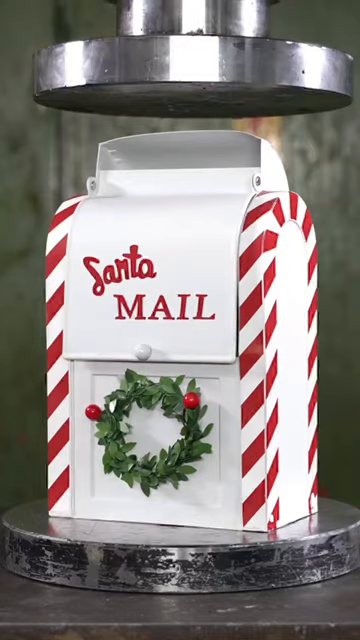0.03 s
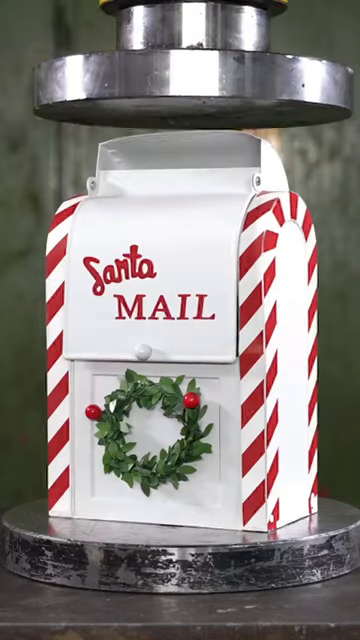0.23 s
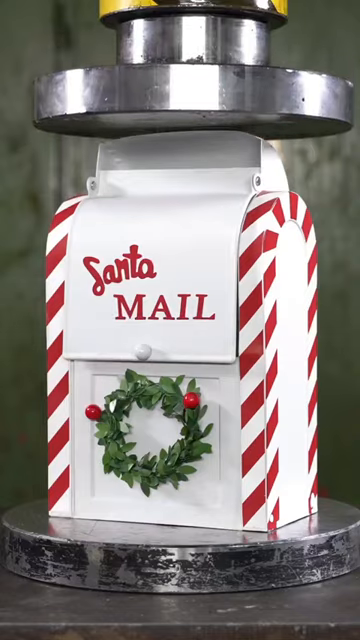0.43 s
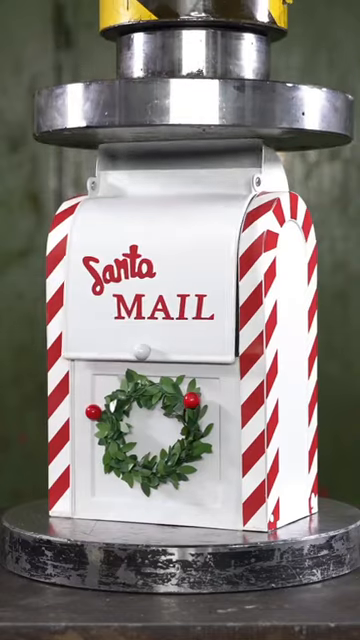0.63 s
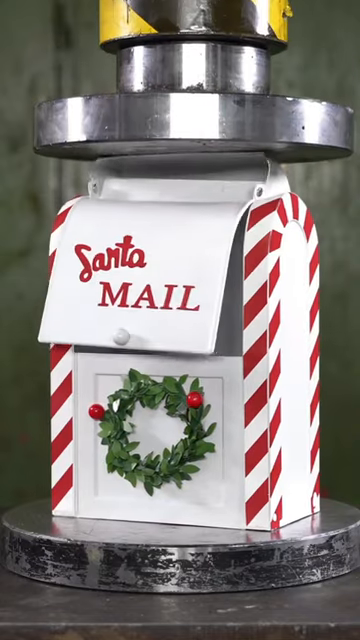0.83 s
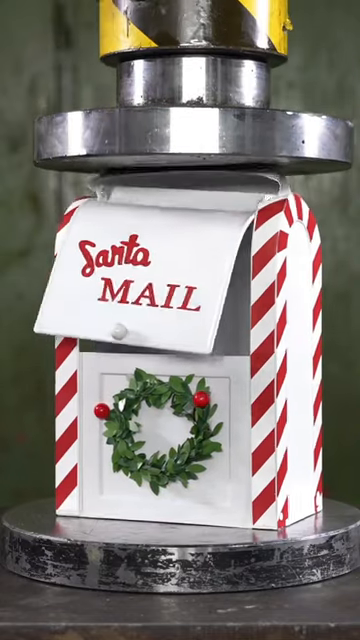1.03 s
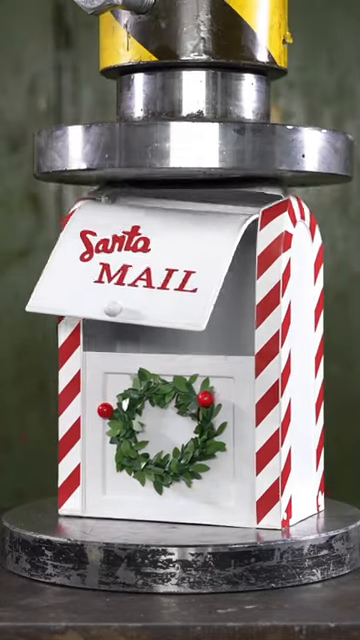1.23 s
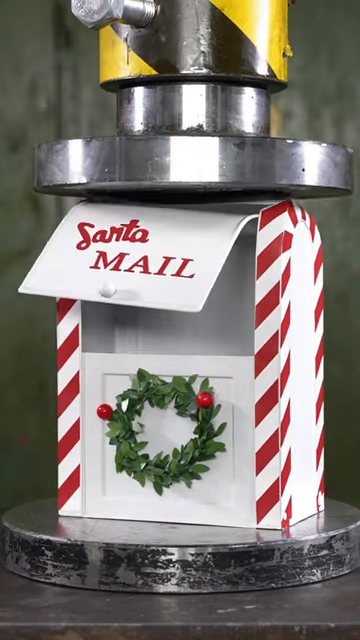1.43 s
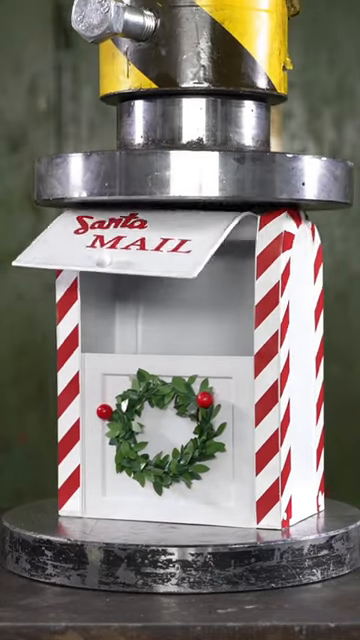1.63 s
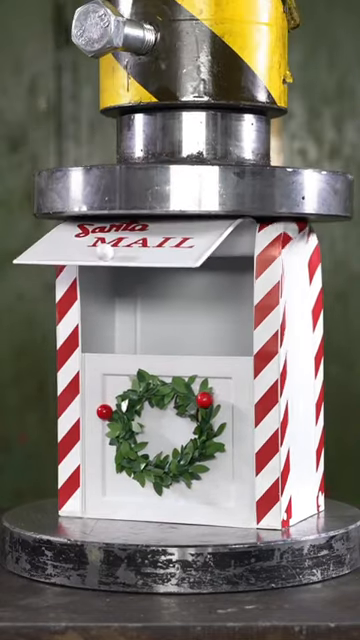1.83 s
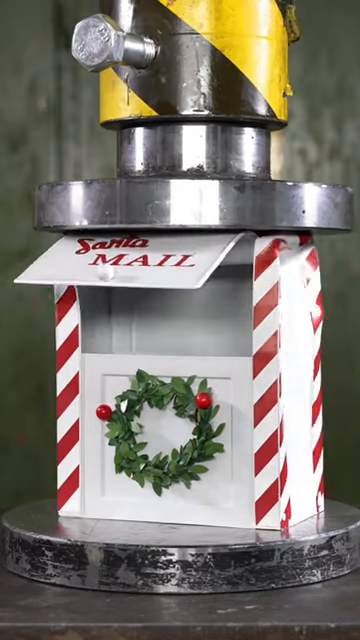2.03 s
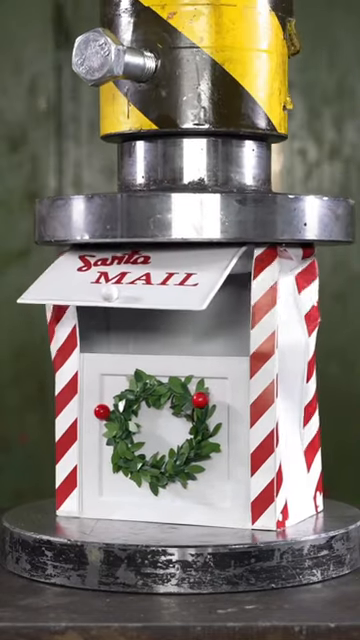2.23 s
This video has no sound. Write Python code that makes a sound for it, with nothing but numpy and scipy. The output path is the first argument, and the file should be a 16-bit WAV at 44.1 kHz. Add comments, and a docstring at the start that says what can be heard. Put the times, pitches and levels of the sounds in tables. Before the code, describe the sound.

Four sharp crunches come from a decorative mailbox being crushed in a workshop, close to the microphone. The hydraulic press hums first, then grows quieter as the walls give way, crackling and creaking over a soft rush of oil.

```python
"""A cardboard box buckles in four crunches under a humming hydraulic press in a workshop.
Each crunch is a dense swell of tiny fractures that sets the box's panels ringing.
Between the crunches the strained board crackles and gives small creaks.
The pump's hum gets quieter and its whine changes tone as the box gives way.
Behind it are rushing oil, faint motor tones and a thin whistle."""
import sys
import numpy as np
from scipy import signal
from scipy.fft import rfft, irfft
from scipy.io import wavfile
from scipy.ndimage import uniform_filter1d, map_coordinates

SR = 44100
rng = np.random.default_rng(int(sys.argv[2]) if len(sys.argv) > 2 else 0)


def dump_mix(stems):
    """Bounce the given channels to the path in sys.argv[1] as a 16-bit WAV at rate SR."""
    frames = np.atleast_2d(stems).T  # one column per channel
    limited = np.clip(frames, -1, 1)  # hard clip at full scale
    pcm = np.round(limited * 32767).astype(np.int16)
    wavfile.write(sys.argv[1], SR, pcm)


N = 105840
T = np.arange(N) / SR
HZ = np.fft.rfftfreq(N, 1 / SR)
BURST_T = np.arange(-2048, 6144) / SR  # seconds around the peak of a short sound


def amp(db):
    """Turns decibels into a gain."""
    return 10 ** (np.asarray(db) / 20)

def unit(x):
    """Scales a signal to an average (rms) level of 1."""
    return x / np.sqrt(np.mean(x ** 2) + 1e-20)

def curve(points):
    """Joins (time_s, value) points with straight lines."""
    return np.interp(T, *np.transpose(points))

def shape(points, hz):
    """Joins (pitch_hz, level_db) points, giving every octave equal room."""
    point_hz, db = np.transpose(points)
    return np.interp(np.log(hz + 1), np.log(point_hz), db)

def wander(axis, step):
    """A smooth random drift that changes about once per step."""
    knots = rng.standard_normal(2048)
    return unit(map_coordinates(knots, [axis / step], order=3, mode="wrap"))

def band(x, low_hz, high_hz, order=20):
    """Keeps the sound between two frequencies."""
    hz = np.fft.rfftfreq(len(x), 1 / SR) + 1
    cut = np.sqrt((1 + (low_hz / hz) ** order) * (1 + (hz / high_hz) ** order))
    return irfft(rfft(x) / cut, len(x))

def tone(cycles, level_db, waver_db=1.76, waver_hz=6.014):
    """A pure tone whose level wavers at random."""
    gain = amp(level_db + waver_db * wander(T, .5 / waver_hz))
    return np.sqrt(2) * gain * np.sin(2 * np.pi * (cycles + rng.random()))

def swell(rise_s, fall_s):
    """A loudness outline: smooth rise, rounded top, fading tail."""
    rising = -.5 * (BURST_T / rise_s) ** 2
    falling = 1 - np.hypot(1, BURST_T / fall_s * np.sqrt(2))
    return np.exp(np.where(BURST_T < 0, rising, falling))

def add(mix, peak_s, sound):
    """Places a short sound so that it peaks at the given time."""
    part = mix[round((peak_s + BURST_T[0]) * SR):][:len(sound)]
    part += sound[:len(part)]

def room(x, split_hz=2000, bass_fade_s=.44, treble_fade_s=.19):
    """The workshop's short echo, duller as it dies away."""
    noise = rng.standard_normal(N)
    bass = band(noise, 20, split_hz)
    tail = bass * amp(-60 * T / bass_fade_s) + (noise - bass) * amp(-60 * T / treble_fade_s)
    return signal.fftconvolve(x, tail / np.linalg.norm(tail))[:N]

# Tone colour of the oil and the workshop: pitch_hz, relative_db
RUSH_COLOUR = [(25, -23), (80, -16), (170, -10), (270, 2.5), (400, -3.5), (540, 1), (800, -9), (1500, -7.5),
               (2200, -11.5), (3800, -18.5), (4500, -14.5), (5700, -14.5), (6600, -22.5), (7600, -18.5),
               (8500, -26.5), (10000, -31.5), (14000, -48)]

def oil_rush(level_db=-52.5, patch_db=1.6, ripple_db=3, ripple_hz=70):
    """Oil rushing through pipes: noise with narrow resonances and drifting louder patches."""
    ripple = ripple_db * wander(HZ, ripple_hz) * np.minimum(HZ / 2500, 1)
    noise = irfft(rfft(rng.standard_normal(N)) * amp(shape(RUSH_COLOUR, HZ) + ripple), N)
    grid = signal.stft(noise, nperseg=512)[2]  # the noise laid out by pitch and time
    patches = uniform_filter1d(rng.standard_normal(grid.shape), size=6, axis=0)
    patches = unit(uniform_filter1d(patches, size=8, axis=1))
    rush = signal.istft(grid * amp(patch_db * patches), nperseg=512)[1][:N]
    return amp(level_db) * unit(rush)

# Faint motor tones: pitch_hz, level_db
MOTOR_TONES = [(50, -81), (99, -77.5), (148, -76), (247, -65.5), (272, -63), (321, -58.5), (500, -63),
               (568, -65)]
# A machine tone that comes and goes: time_s, level_db
DRONE_LEVEL = [(.35, -61), (.48, -75), (.73, -58), (.85, -75), (1.13, -54), (1.25, -75), (1.8, -63.5),
               (2.2, -58.5)]

def motor(drone_hz=741):
    """The motor's faint tones, with one more that fades in and out."""
    steady = sum(tone(hz * T, db) for hz, db in MOTOR_TONES)
    return steady + tone(drone_hz * T, curve(DRONE_LEVEL))

# Pump speed, one stroke per cycle: time_s, pitch_hz
PUMP_SPEED = [(.15, 296.4), (.8, 295.9), (1.15, 297), (2.4, 297.3)]

def pump_strokes():
    """Counts the strokes the pump has made so far."""
    return np.cumsum(curve(PUMP_SPEED)) / SR

def whistle(strokes, pitch_hz=9140, level_db=-78.5):
    """A thin whistle, chopped by the pump's strokes."""
    pulses = unit(np.maximum(np.cos(2 * np.pi * strokes), 0) ** 2)
    return pulses * tone(pitch_hz * T, level_db)

def shaft(strokes, strokes_per_turn=12, level_db=-55.5, spread_db=3.5):
    """Weak tones at multiples of the shaft's turning rate, coloured by the same pipes as the oil."""
    turns = strokes / strokes_per_turn
    turn_hz = curve(PUMP_SPEED).mean() / strokes_per_turn
    out = np.zeros(N)
    for k in range(strokes_per_turn + 2, 100):
        if k % strokes_per_turn:  # skip the pump's own tones
            gain = amp(shape(RUSH_COLOUR, k * turn_hz) + spread_db * rng.standard_normal())
            out += gain * np.sin(2 * np.pi * (k * turns + rng.random()))
    return amp(level_db) * unit(out)

# The pump's lowest tone: time_s, level_db
HUM_LEVEL = [(.15, -33.5), (.5, -35), (.87, -36), (1.01, -34.5), (1.05, -55), (1.13, -46), (1.7, -44.5),
             (2.0, -48), (2.17, -46.5), (2.4, -50)]
# The tone an octave above it: time_s, level_db
OCTAVE_LEVEL = [(.15, -44), (.27, -46), (.33, -39.5), (.48, -39.5), (.6, -44.5), (.65, -53), (.73, -43),
                (1.0, -44), (1.1, -53.5), (1.35, -53), (1.48, -45), (1.53, -57), (1.7, -48), (1.8, -64),
                (2.4, -52.5)]
# Tones at 3, 4, 5... times the pump's pitch: start_db, after_first_give_db, after_second_give_db
WHINE_LEVELS = [(-58, -57, -55.5), (-49.5, -59.5, -56.5), (-54, -54.5, -54.5), (-61, -60.5, -57),
                (-59.5, -57.5, -66), (-66.5, -70, -69), (-68, -69, -66), (-71.5, -70.5, -66.5),
                (-67.5, -76, -77)]
# Slow swell of the tone at 5 times the pump's pitch: time_s, boost_db
FIFTH_TONE_SWELL = [(.24, -3.5), (.3, 3.5), (.37, -1), (.43, 5), (.5, -0.5), (.85, -6.5), (.96, 1.5),
                    (1.14, 0), (1.24, -10), (1.34, -7), (1.41, 3.5), (1.78, 1.5), (2.1, -12), (2.2, 2),
                    (2.4, -3)]

def pump(strokes, give_s=(1.04, 1.31), give_length_s=.055, top_db=-76.5, top_db_per_octave=-4.5):
    """The pump's strokes hum and whine; its load changes both times the box gives way."""
    hum = tone(strokes, curve(HUM_LEVEL), waver_db=.34)
    hum += tone(2 * strokes, curve(OCTAVE_LEVEL), waver_db=.68)
    first_give, second_give = (np.clip((T - s) / give_length_s + .5, 0, 1) for s in give_s)
    whine_db = {k: start + (middle - start) * first_give + (end - middle) * second_give
                for k, (start, middle, end) in enumerate(WHINE_LEVELS, 3)}
    whine_db[5] += curve(FIFTH_TONE_SWELL)
    last = max(whine_db)
    for k in range(last, 26):  # ever fainter tones above those in the table
        whine_db[k + 1] = top_db + top_db_per_octave * np.log2(k / last)
    return hum + sum(tone(k * strokes, db) for k, db in whine_db.items())

# Tone colour that the box gives every fracture: pitch_hz, relative_db
BOARD_COLOUR = [(150, -5), (230, -2.5), (330, 1), (560, -2), (800, -2.5), (1050, 1.5), (1800, 1.5),
                (5500, 1), (12500, -3.5)]

def fractures(per_s, size, spread_db=2.4, ripple_db=3, ripple_hz=90):
    """Tiny snaps of uneven size, coloured by the board's many close resonances."""
    hz = np.fft.rfftfreq(size, 1 / SR)
    snaps = (rng.random(size) < per_s / SR) * rng.choice([-1, 1], size)
    strengths = amp(spread_db * np.minimum(rng.exponential(1, size), 4))
    ripple = ripple_db * wander(hz, ripple_hz) * np.minimum(hz / 1500, 1)
    return irfft(rfft(snaps * strengths) * amp(shape(BOARD_COLOUR, hz) + ripple), size)

# The fine, high crackle of strained board: time_s, level_db
CRACKLE_LEVEL = [(.15, -82), (.62, -70.5), (.9, -66.5), (1.08, -54), (1.15, -62.5), (1.3, -60.5),
                 (1.45, -54), (1.56, -64), (1.8, -61.5), (2.05, -54.5), (2.2, -61), (2.4, -64)]

def strain(clump_db=2, clump_s=.025, middle_db=-1.5, groan_db=3):
    """Board under load crackles in clumps, and its walls answer with a low groan."""
    snaps = fractures(per_s=4000, size=N) * amp(clump_db * wander(T, clump_s))
    crackle = unit(band(snaps, 2900, 11000))
    middle = amp(middle_db) * unit(band(snaps, 537, 2900))
    groan = amp(groan_db) * unit(band(snaps, 283, 537))
    return amp(curve(CRACKLE_LEVEL)) * (crackle + middle + groan)

def fold(outline, fold_hz, fold_db, edges_hz, levels_db, width_octaves=.041):
    """Board folding: a swell of fractures with one resonance and its own level in each band."""
    hz = np.fft.rfftfreq(len(outline), 1 / SR) + 1
    octaves_away = np.log2(hz / fold_hz)
    resonance = amp(fold_db / (1 + (octaves_away / width_octaves) ** 2))
    snaps = irfft(rfft(fractures(per_s=11000, size=len(outline))) * resonance)
    bands = sum(amp(db) * unit(band(snaps, low, high) * outline)
                for low, high, db in zip(edges_hz, edges_hz[1:], levels_db))
    level = np.sqrt(np.mean(outline ** 2) * np.sum(amp(levels_db) ** 2))
    return unit(bands) * level

# Borders of a creak's four bands: edge_hz
CREAK_BANDS = [290, 600, 3600, 7500, 13500]
# Creaks: peak_s, rise_and_fall_s, fold_hz, then one level_db per band
BOX_CREAKS = [(.684, .0099, 9400, -62, -70, -57, -58.5), (.735, 0.0082, 4600, -62, -66, -57, -62),
              (.774, .011, 7000, -62, -70, -62, -61), (.845, .0058, 12500, -62, -73, -63, -59.5),
              (.942, .009, 5170, -67, -65, -55.5, -57.5), (1.098, .0086, 4930, -42, -49, -44.5, -45.5),
              (1.242, 0.0073, 6380, -63, -53, -43.5, -48.5), (1.422, 0.013, 7920, -57, -51, -54, -55),
              (1.465, 0.0067, 7400, -57, -58, -47.5, -51.5), (1.498, 0.0098, 2620, -64, -47.5, -53, -55),
              (1.75, 0.0085, 7850, -40, -48, -47.5, -48.5), (1.789, 0.0087, 4150, -41.5, -46, -47.5, -46),
              (1.94, 0.0085, 10200, -41.5, -48, -46.5, -46), (2.02, .011, 5680, -46, -45.5, -47.5, -54),
              (2.06, 0.0096, 1900, -44, -52, -57, -57), (2.129, .011, 3250, -50, -46, -52.5, -53.5),
              (2.244, .0082, 9600, -58, -66, -57, -53), (2.323, .013, 7400, -51, -64, -61, -62)]

def creaks(fold_db=10.5):
    """Small, quiet bursts of fractures before, between and after the crunches."""
    out = np.zeros(N)
    for peak_s, swell_s, fold_hz, *levels_db in BOX_CREAKS:
        add(out, peak_s, fold(swell(swell_s, swell_s), fold_hz, fold_db, CREAK_BANDS, levels_db))
    return out

# Ringing panels: peak_s, pitch_hz, level_db, ring_s (the ring drops 60 dB in about 0.8 of this)
PANEL_RINGS = [(1.030, 1695, -27, .055), (1.043, 450, -32, .068), (1.040, 600, -38, 0.085),
               (1.036, 715, -35.5, .053), (1.030, 1045, -34, .081), (1.030, 1452, -39, 0.095),
               (1.032, 2215, -41, .07), (1.045, 155, -51.5, 0.089), (1.373, 4168, -33, 0.078),
               (1.378, 960, -39.5, .082), (1.383, 450, -36.5, .073), (1.385, 510, -35.5, .066),
               (1.375, 3095, -35, .073), (1.887, 340, -26, 0.12), (1.884, 435, -33, 0.086),
               (1.926, 484, -23.5, 0.067), (1.928, 232, -40.5, 0.049), (1.978, 255, -37.5, .086),
               (1.982, 432, -34, .08)]

def panels(rise_s=.0062, bend_fraction=.0029, bend_s=.0048):
    """Panels ring briefly as folds snap through, their pitch unsteady while they bend."""
    out = np.zeros(N)
    for peak_s, hz, db, ring_s in PANEL_RINGS:
        bend = 1 + bend_fraction * wander(BURST_T - BURST_T[0], bend_s)
        cycles = np.cumsum(hz * bend) / SR + rng.random()
        outline = swell(rise_s, ring_s / np.log(1000))
        add(out, peak_s, np.sqrt(2) * amp(db) * outline * np.sin(2 * np.pi * cycles))
    return out

# Borders of a crunch's six bands: edge_hz
CRUNCH_BANDS = [280, 620, 2000, 3050, 4400, 7600, 13000]
# Crunches: peak_s, rise_s, fall_s, fold_hz, fold_boost_db, then one level_db per band
BOX_CRUNCHES = [(1.029, 0.0091, .010, 6840, 4.1, -35, -28.5, -33, -39.5, -29, -38.5),
                (1.374, .0076, .0098, 6200, 7, -38.5, -32.5, -33.5, -29.5, -30, -34.5),
                (1.886, .007, 0.0087, 5480, 14.4, -33, -33, -36, -34.5, -28, -40),
                (1.979, .011, .017, 1895, 6, -35.5, -37, -44, -42.5, -45, -45)]

def crunches():
    """The walls buckle, each time in a loud, dense swell of fractures."""
    out = np.zeros(N)
    for peak_s, rise_s, fall_s, fold_hz, fold_db, *levels_db in BOX_CRUNCHES:
        add(out, peak_s, fold(swell(rise_s, fall_s), fold_hz, fold_db, CRUNCH_BANDS, levels_db))
    return out

def scene(crush_echo_db=-11.5, ring_echo_db=-19.5):
    """The box and the press, heard from close by in one channel."""
    crush = crunches() + creaks()
    rings = panels()
    strokes = pump_strokes()
    press = pump(strokes) + motor() + whistle(strokes) + shaft(strokes) + oil_rush()
    box = strain() + crush + rings
    echo = room(amp(crush_echo_db) * crush + amp(ring_echo_db) * rings)
    return (press + box + echo)[None]

def record(dry, start_s=.15, fade_in_s=.0017, cutoff_hz=14800):
    """The sound starts abruptly after a short silence, with its highest treble cut off."""
    opened = dry * np.clip((T - start_s) / fade_in_s, 0, 1)
    low_pass = signal.firwin(511, cutoff_hz, window=("kaiser", 9), fs=SR)
    return signal.oaconvolve(opened, low_pass[None], "same")


dry = scene()
out = record(dry)
dump_mix(out)
```